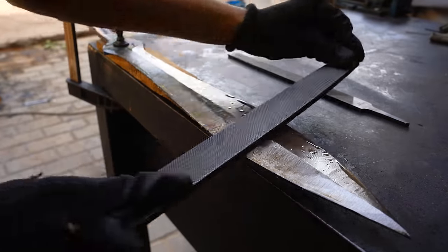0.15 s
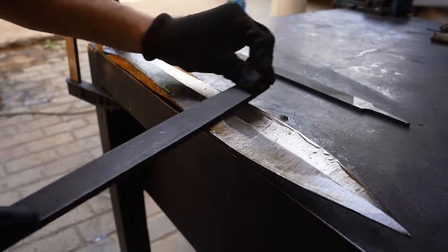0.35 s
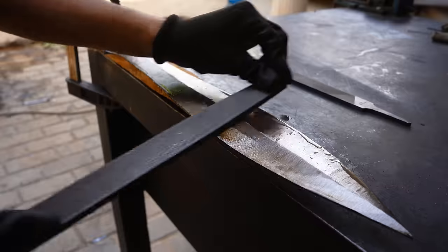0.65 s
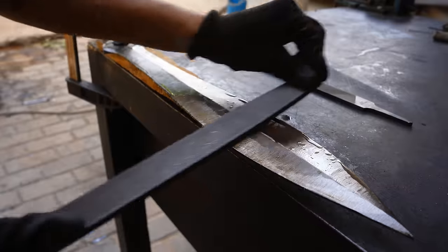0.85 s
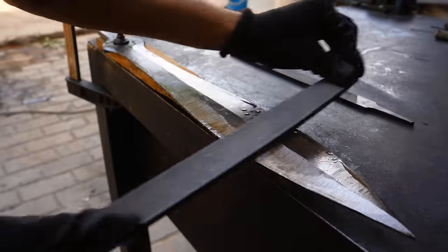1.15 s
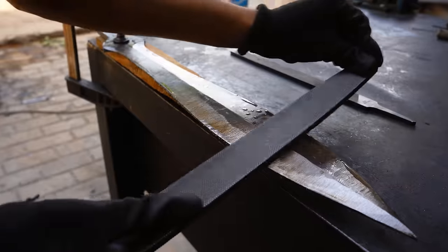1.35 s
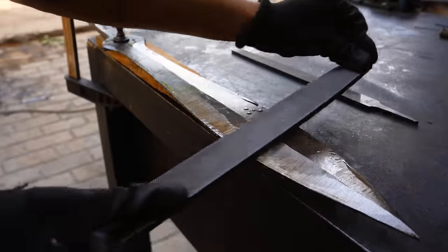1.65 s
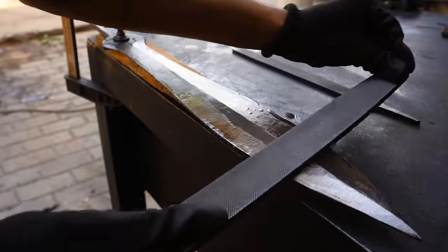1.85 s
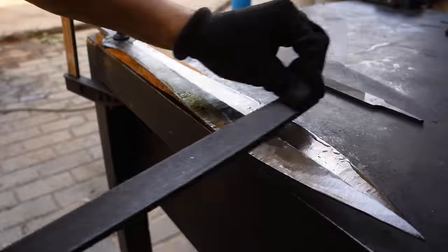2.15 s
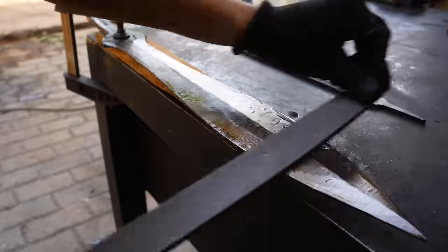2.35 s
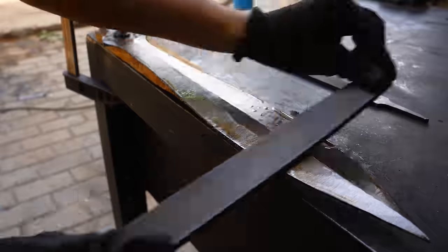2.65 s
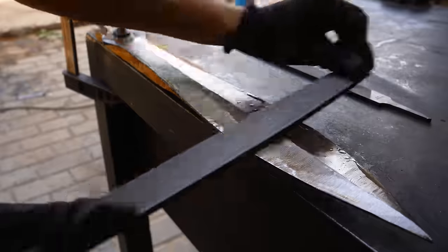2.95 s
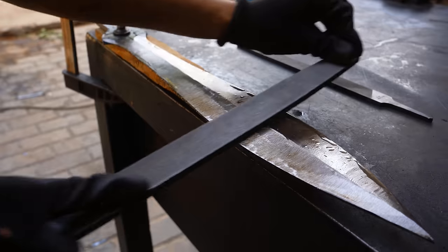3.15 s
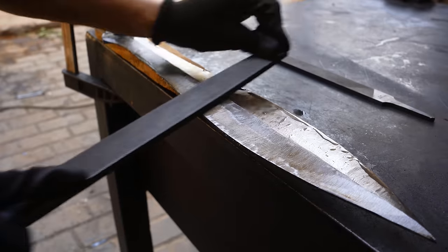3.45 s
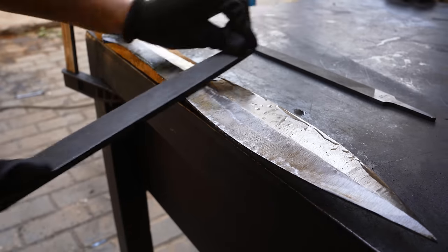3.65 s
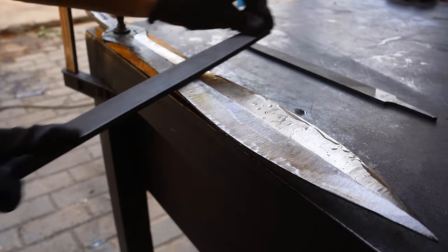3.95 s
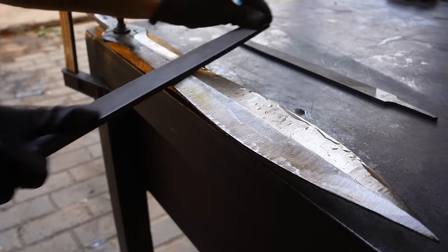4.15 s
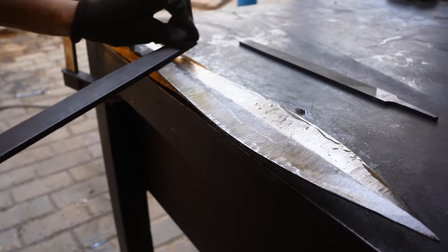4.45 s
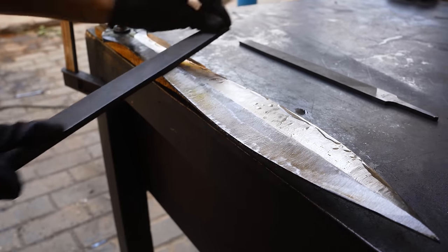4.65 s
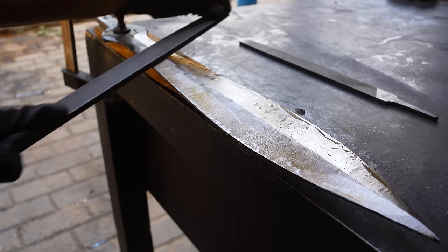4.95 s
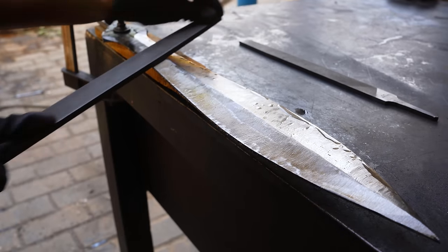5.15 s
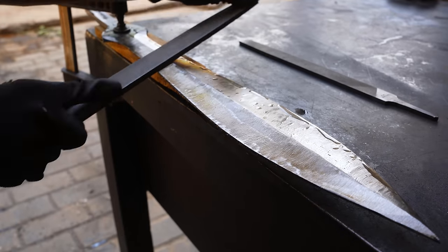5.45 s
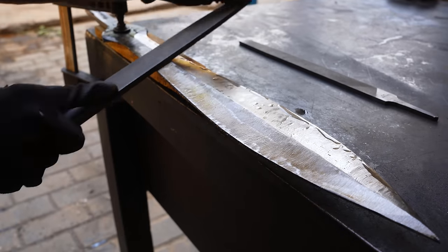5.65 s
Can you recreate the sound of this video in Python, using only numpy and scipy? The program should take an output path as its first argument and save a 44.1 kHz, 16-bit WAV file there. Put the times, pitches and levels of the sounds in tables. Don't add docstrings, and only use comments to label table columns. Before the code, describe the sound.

Close up, rough file teeth rasp on hard iron, each push and pull swelling then dipping at the turn. One relaxed, quieter stroke leads to quicker, higher strokes, then a very fast, bright, regular sawing that grows louder and scratchier as the file nears the clamp. Short dry shed echo, slight hiss and low distant yard noise remain underneath.

```python
import sys
import numpy as np
from scipy import signal
from scipy.fft import rfft, irfft, next_fast_len
from scipy.io import wavfile
from scipy.ndimage import map_coordinates

SR = 44100
rng = np.random.default_rng(int(sys.argv[2]) if len(sys.argv) > 2 else 0)


def pcm_store(signal):
    levels = np.round(np.clip(np.atleast_2d(signal), -1, 1) * 32767)
    wavfile.write(sys.argv[1], SR, levels.astype(np.int16).T)


def volts_from_decibels(level):
    exponent = np.asarray(level, float) / 20
    return 10 ** exponent


N = 255780

# (playback speed [x normal], start [s], end [s])
PASSAGES = [
    (1, 0, .3),
    (2, .3, 1.596),
    (3, 1.596, 3.628),
    (3, 3.628, 5.8),
]
JOIN = 400


def unit(x):
    return x / np.sqrt(np.mean(np.abs(x) ** 2) + 1e-20)


def along(points, hz):
    f, v = np.transpose(points)
    return np.interp(np.log(hz + 1), np.log(f + 1), v)


def wobble(rate, count):
    knots = rng.standard_normal(int(count * rate / SR) + 2)
    return np.interp(np.arange(count) * rate / SR, np.arange(len(knots)), knots)


def filtered(x, response):
    size = next_fast_len(x.shape[-1] + 8192)
    spectrum = rfft(x, size) * response(np.fft.rfftfreq(size, 1 / SR))
    return irfft(spectrum, size)[..., :x.shape[-1]]


def spread(pair, colour):
    # (frequency [Hz], likeness [0-1])
    alike = [(100, 1), (300, 1), (600, 1), (1400, 0.92), (3000, 0.72), (4200, 0.12), (7000, 0.033),
             (15000, 0.057)]
    turn = lambda hz: np.arccos(np.clip(along(alike, hz), -1, 1)) / 2
    mid, side = filtered(pair, lambda hz: volts_from_decibels(along(colour, hz)) * [np.cos(turn(hz)), np.sin(turn(hz))])
    return np.array([mid + side, mid - side])


def patchy(x, speed, patchy_db=3.0):
    z = signal.stft(x, nperseg=512)[2]
    bins, frames = np.indices(z.shape[1:])
    places = [0.55 * bins, .07 * speed * frames]
    field = map_coordinates(rng.standard_normal(z.shape[1:]), places, order=1)
    return signal.istft(z * volts_from_decibels(patchy_db * unit(field)), nperseg=512)[1][:, :x.shape[1]]


def yard(count, speed, passage):
    # (pitch [Hz], level [dB])
    machine = [
        (331, -56),
        (657, -69),
        (867, -70),
        (867, -61),
    ]
    # (frequency [Hz], level per Hz [dB])
    rumble_colour = [(30, -92), (70, -28.5), (100, -20.5), (150, -10.5), (200, -15), (330, -3.5),
                     (500, -5.5), (800, -4), (1500, -26), (3000, -60)]
    rumble_db = [1.7, 12.2, 18.5, 19.6]
    lowest_hz = [193, 130, 215, 230]
    hz, db = machine[passage]
    loudness = volts_from_decibels(db + 3.6 * wobble(8.65, count))
    tone = loudness * np.sin(2 * np.pi * np.cumsum(hz + 4 * wobble(17.1, count)) / SR)
    sped_up = [(f * speed, level) for f, level in rumble_colour]
    rumble = spread(rng.standard_normal((2, count)), sped_up)
    rumble = filtered(rumble, lambda f: 1 - 1 / (1 + (f / lowest_hz[passage]) ** 10))
    return volts_from_decibels(rumble_db[passage]) * unit(patchy(rumble, speed)), tone


def shed(x):
    # (frequency [Hz], time to fall by 60 dB [s])
    echo = [(300, 0.19), (2000, 0.37), (10000, 0.015)]
    hz, t, z = signal.stft(rng.standard_normal((2, SR // 3)), SR, nperseg=256)
    dying = z * volts_from_decibels(-60 * t / along(echo, hz)[:, None])
    tail = spread(signal.istft(dying, SR, nperseg=256)[1], [(1000, 0)])
    tail = tail / np.linalg.norm(tail[0])
    return signal.fftconvolve(x.mean(axis=0, keepdims=True), tail, axes=1)[:, :x.shape[1]]


def strokes():
    # (push start [s], push peak [dB], pull start [s], pull peak [dB], blade ring at this spot [dB])
    easy = [
        (0.0, -41, 0.23, -36.5, -4),
        (0.421, -32.5, 0.58, -34, -2),
        (0.729, -33, 0.899, -33.5, 2.5),
        (1.037, -29.5, 1.195, -33.5, -0.5),
        (1.354, -28.5, 1.511, -34, 1),
    ]
    quick = [(1.649, -31, 1.748, -36.5, -15), (1.848, -31.5, 1.96, -38.5, -13),
             (2.062, -33.5, 2.168, -34.5, 2.5), (2.28, -31.5, 2.388, -33, 10.5),
             (2.504, -32.5, 2.605, -33.5, 9), (2.72, -35, 2.814, -34.5, 7.5),
             (2.917, -34.5, 3.011, -33.5, -18), (3.121, -34.5, 3.212, -33, -10),
             (3.322, -34.5, 3.418, -33.5, 5), (3.523, -31, 3.628, -32.5, 6.5),
             (3.732, -29.5, 3.828, -32.5, 11.5), (3.927, -31.5, 4.025, -30.5, 3),
             (4.13, -29, 4.231, -30, 4), (4.323, -28.5, 4.422, -29, 2.5), (4.524, -30.5, 4.626, -31, -15),
             (4.725, -30, 4.82, -29, -7), (4.921, -27.5, 5.012, -28, 2), (5.114, -26.5, 5.205, -28, -4),
             (5.299, -28, 5.405, -31.5, -9), (5.492, -28.5, 5.586, -30, -7), (5.683, -27, 5.778, -19, 2)]
    push_s, push_db, pull_s, pull_db, ring_db = np.transpose(easy + quick)
    turn_s = np.ravel([push_s, pull_s], "F")
    peak_db = np.ravel([push_db, pull_db], "F")
    passage = np.searchsorted(np.transpose(PASSAGES)[2], turn_s + .01)
    passage = np.clip(passage, 0, len(PASSAGES) - 1)
    pulling = np.arange(len(turn_s)) % 2
    return turn_s, peak_db, np.repeat(ring_db, 2), lambda rule: np.array(rule)[passage, pulling]


def hand():
    # (time [s], level [dB])
    resting = [(0, -39), (.23, -57), (.58, -52.5), (1.15, -51), (1.4, -51.5), (2.3, -51), (2.7, -49),
               (3.3, -51), (3.7, -46.5), (4.6, -45), (5.8, -45)]
    far_end_db = [-1.5, 2, 2.5, 2]
    # (time [s], level [dB])
    last_turn = (5.88, -57)
    peak_at = [(0.29, 0.62), (.41, 0.45), (.46, 0.36), (.44, 0.4)]
    pointed = [(0.99, 1.04), (1.5, 1.5), (1.24, 0.97), (1.31, 1.12)]
    # (push [dB], pull [dB])
    body_db = [(2, 1), (-2, -3.5), (-1.5, -3), (3, 2.5)]
    # (push [dB], pull [dB])
    hiss_db = [(2, 2.5), (-3.5, 0.5), (0, 2), (-0.5, -0.5)]
    # (push [dB], pull [dB])
    shake_db = [(3.5, -1.5), (1, -1.5), (0.5, 2.5), (-1.5, -0.5), (-2.5, 1), (-2.5, 1), (-1, -4), (1, 1),
                (2, 2), (1.5, 3), (3.5, -4.5), (-3.5, 0), (-1, 1.5), (1.5, -1), (0, -2), (-0.5, -4),
                (-1, -0.5), (-1, -0.5), (0, -4), (-0.5, 0), (0, 1.5), (1, -0.5), (1, 0.5), (1.5, -1.5),
                (0, 3), (2.5, 0)]
    time = np.arange(N) / SR
    turn_s, peak_db, ring_db, rule = strokes()
    turn_db = np.interp(turn_s, *np.transpose(resting)) + rule([(0, db) for db in far_end_db])
    turn_s, turn_db = np.append(turn_s, last_turn[0]), np.append(turn_db, last_turn[1])
    peak_s = turn_s[:-1] + np.clip(rule(peak_at), .15, .85) * np.diff(turn_s)
    knots = np.sort(np.append(turn_s, peak_s))
    half = np.interp(time, knots, np.arange(len(knots)))
    stroke = (half // 2).astype(int)
    swell = np.abs(np.sin(np.pi * half / 2)) ** np.clip(rule(pointed)[stroke], .4, 4)
    weak = np.interp(half / 2, np.arange(len(turn_db)), turn_db)
    force = volts_from_decibels(weak + (peak_db[stroke] - weak) * swell)
    colours = (rule(body_db), ring_db, rule(hiss_db), np.ravel(shake_db))
    tone_db = [np.interp(time, peak_s, db) for db in colours]
    return force, swell, np.sin(np.pi * half), tone_db


def bites(fade_s=0.0059):
    # (time [s], peak level [dB])
    catches = [(0.772, -30), (1.395, -20.5), (1.6672, -22), (1.8813, -20), (2.3153, -20), (2.9423, -21),
               (3.9568, -19.5), (4.2633, -21), (4.4484, -16), (4.5432, -19), (4.648, -21.5), (4.9413, -21),
               (5.1377, -21), (5.2172, -15.5), (5.3176, -20), (5.426, -17)]
    start_s, peak_db = np.transpose(catches)
    since = np.arange(N) / SR - start_s[:, None]
    return volts_from_decibels(peak_db - 15.5) @ (np.exp(-np.abs(since) / fade_s) * (since > 0))


def grit(count, speed, spiky_db=2.2, catch_db=0.8, top=2.6):
    sizes = volts_from_decibels(spiky_db * wobble(500 * speed, count) + catch_db * wobble(25 * speed, count))
    return unit(np.tanh(sizes * rng.standard_normal((2, count)) / top))


def filing(force, speed, passage, roam=1.64, damping=2.03, bend=.005, scatter=1.66):
    low_hz = [289, 329, 363, 384, 438, 458, 622, 810, 852, 1028]
    middle_hz = [1075, 1149, 1293, 1355, 1517, 1666, 1785, 1955, 2029, 2235]
    high_hz = [2440, 2665, 3240, 3460, 4000, 4235, 4350, 4890, 5500, 6700]
    # (width [Hz], level in
    # passage 1 [dB], passage 2 [dB], passage 3 [dB], passage 4 [dB])
    modes = [(4.8, -24, -13.5, -14.5, -12), (5.7, -22, -7, -13.5, -27), (7.2, -6, -11.5, -6, -3.5),
             (7.2, -7, -20, -7, -5), (6.4, -14, -10, -23, -9.5), (10, -4, -4, -9, -5),
             (7, -24, -8, -7, -8.5), (13, -21, -7, -10, -7), (11, -9, -8, -5.5, -6.5),
             (10.5, -21, -21, -23, -9.5),
             (11, -2, -5, -1.5, 1.5), (15, -5, -5, -7, -14.5), (13.6, -15, -4.5, -5.5, -13),
             (14.8, -8, -6.5, -4.5, -4.5), (18, -4, -2.5, -4, -1), (18.0, -18, -5.5, -17, -7.5),
             (19.5, -21, -22, -13, -17), (21.0, -16, -10.5, -5, -7.5), (21.0, -8, -1.5, -2, -2.5),
             (23.6, -21, -7, -9, -1.5),
             (24.7, -22, -8, -9.5, -4), (28.2, -21, -8.5, -10.5, -6.5), (34.7, -4.5, -10, -5.5, -3.5),
            (37.5, -22, -24, -13, -9), (44.2, -15, -11, -12.5, -7), (45.0, -12, -12.5, -13.5, -8.5),
            (46.5, -16, -11, -11.5, -12), (52.5, -9.5, -14.5, -12, -8.5), (58.5, -6.5, -8, -38, -36),
            (72.0, -10, -15, -42, -41)]
    # (frequency [Hz], level per Hz [dB])
    rasp = [
        [(88, -50), (150, -40), (326, -32), (1060, -3.5), (2100, 1.5), (3100, -11), (3410, -1.5), (5540, -6.5),
         (15500, -15)],
        [(240, -53), (400, -31), (894, -6), (1170, -15.5), (1660, -4), (4130, -3), (5860, -11), (6710, -4),
         (7470, -10), (13700, -11), (15000, -27)],
        [(350, -56), (600, -22.5), (1110, -15), (1400, -2), (1770, -11), (3140, -3), (3650, -3), (5980, -2.5),
         (8890, -8), (15000, -11), (15800, -18)],
        [(350, -49), (600, -19), (845, -11.5), (996, -16), (1130, -4), (1770, -7.5), (3140, -3), (3650, -2.5),
         (5980, 1.5), (8770, -5), (12400, -3.5), (15800, -16)],
    ]
    rasp_db = [-9, -6.5, -5, -4]
    treble_loss_hz = 4000
    count = len(force)
    teeth = force * grit(count, speed)
    sound = volts_from_decibels(rasp_db[passage]) * patchy(spread(teeth, rasp[passage]), speed)
    for hz, (width_hz, *levels_db) in zip(low_hz + middle_hz + high_hz, modes):
        loss_hz = damping * width_hz * (1 + (hz / treble_loss_hz) ** 2)
        pole = np.exp(np.pi * speed * (2j * hz - loss_hz) / SR)
        shape = 2.02 * np.cos(rng.uniform(0, np.pi) + roam * wobble(7.5 * speed, count)) ** 2
        push = volts_from_decibels(levels_db[passage]) * shape * teeth[0]
        ring = signal.lfilter([2 * (1 - abs(pole)) ** 2], np.poly([pole, pole]), push)
        ring *= np.exp(2j * np.pi * np.cumsum(bend * hz * speed * wobble(4 * speed, count)) / SR)
        lead = scatter * min(hz * speed / 4500, 1) ** 2 * rng.normal()
        sound += np.real(ring * np.exp(.5j * np.array([[lead], [-lead]])))
    sound = filtered(sound, lambda hz: 1 - 1 / (1 + (hz / (220 * speed)) ** 6))
    return sound * np.sqrt(np.mean(force ** 2) / np.mean(sound ** 2))


def hollowed(x, speed, passage):
    # (frequency [Hz], half width [Hz], depth mid-blade [0-1], depth near the clamp [0-1])
    hollows = [(1794, 70, .4, 0.73), (3657, 126, 0.3, 0.83), (4190, 133, 0.3, .8)]

    def dip(hz):
        left = 1
        for at, width, *depth in hollows:
            deep = np.clip([0, 0, *depth][passage], 0, .97)
            left = left * (1 - deep / (1 + ((hz - at) / width) ** 4))
        return left

    share = np.clip(0.71 + .5 * wobble(2.5 * speed, x.shape[1]), 0, 1)
    return x + share * (filtered(x, dip) - x)


def pressure(x, swell, push, tone_db, dull_db=4, dark_db=-2.5, late_db=0.5):
    body_db, ring_db, hiss_db, shake_db = tone_db
    below = lambda edge_hz: filtered(x, lambda hz: 1 / (1 + (hz / edge_hz) ** 8))
    deep, low, middle, most = below(1760), below(2670), below(3130), below(8500)
    shaken = low - deep + deep * volts_from_decibels(shake_db)
    body = shaken * volts_from_decibels(body_db + dull_db * (0.5 - swell) - late_db * push)
    ring = (middle - low) * volts_from_decibels(ring_db - 0.71 * late_db * push)
    hiss = (x - most) * volts_from_decibels(hiss_db + dark_db * (1 - swell))
    return body + ring + most - middle + hiss


def scene():
    side_db = [0.97, 0.37, -0.087, -0.7]
    traffic_db = [-53.5, -65, -70, -75]
    force, swell, push, tone_db = hand()
    force = force + bites()
    iron, traffic, hum = np.zeros((3, 2, N))
    for passage, (speed, start, end) in enumerate(PASSAGES):
        part = slice(round(start * SR), round(end * SR) + JOIN)
        sides = volts_from_decibels(side_db[passage] * np.array([[.5], [-.5]]))
        near = filing(force[part], speed, passage) * sides
        count = near.shape[1]
        since = np.arange(count) + JOIN * (start == 0)
        left = round((end - start) * SR) + JOIN - np.arange(count)
        edges = np.sin(np.pi / 2 * np.clip(np.minimum(since, left) / JOIN, 0, 1))
        iron[:, part] += edges * hollowed(near + volts_from_decibels(-9.0) * shed(near), speed, passage)
        rumble, tone = yard(count, speed, passage)
        traffic[:, part] += edges * volts_from_decibels(traffic_db[passage]) * rumble
        hum[:, part] += edges * tone
    sway_db = 1 * wobble(4.98, N)
    return volts_from_decibels(3.0) * pressure(iron, swell, push, tone_db) + volts_from_decibels(sway_db) * traffic + hum


def roll_off(x):
    return signal.sosfilt(signal.butter(12, 16520, fs=SR, output="sos"), x)


def record(dry):
    # (frequency [Hz], level per Hz [dB])
    mic_hiss = [(150, -36), (300, -8), (1000, -2), (6000, 0.5), (13000, -2.5), (15800, -13)]
    # (frequency [Hz], left minus right [dB])
    lean = [(300, 0), (1000, -0.5), (2200, -.5), (4500, -3), (9000, -3.3), (14000, -1.2)]
    # (frequency [Hz], phase by which left lags [radians])
    lag = [(500, 0.068), (2000, 0.34), (4000, 0.74), (7000, 0.26), (12000, 0.13)]
    top_hz = 15870
    sides = np.array([[.5], [-.5]])
    hiss = filtered(rng.standard_normal(dry.shape), lambda hz: volts_from_decibels(along(mic_hiss, hz)))
    mix = dry + volts_from_decibels(-66) * unit(hiss)
    ports = lambda hz: volts_from_decibels(along(lean, hz) * sides) * np.exp(-1j * along(lag, hz) * sides) * (hz < top_hz)
    return roll_off(filtered(mix, ports))


dry = scene()
out = record(dry)
pcm_store(out)
```